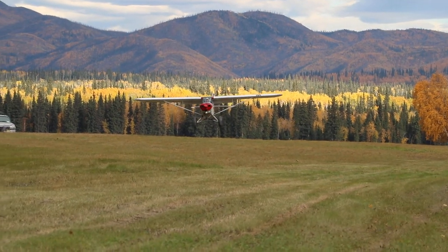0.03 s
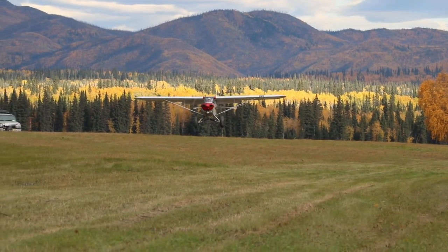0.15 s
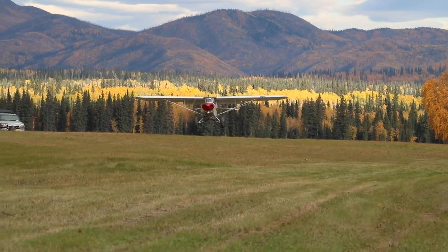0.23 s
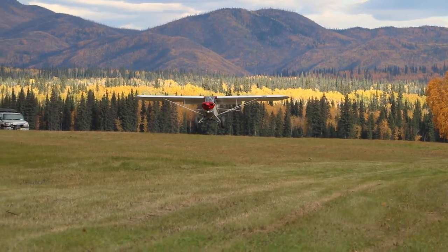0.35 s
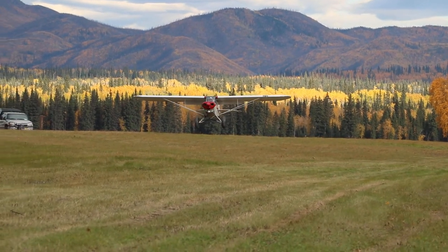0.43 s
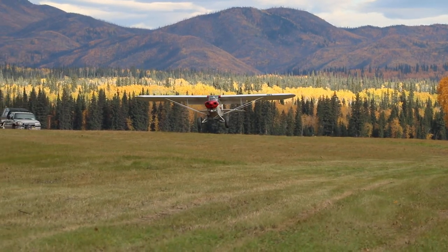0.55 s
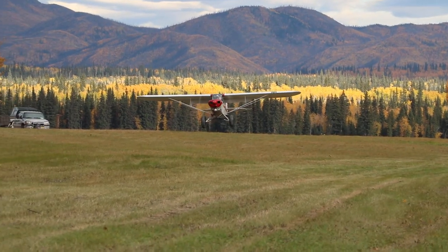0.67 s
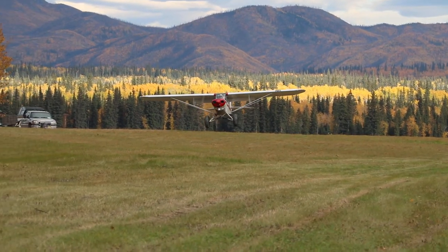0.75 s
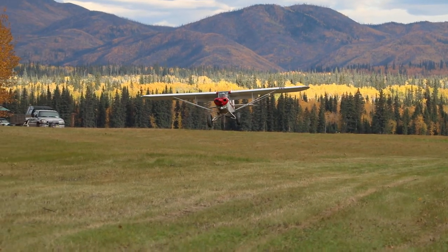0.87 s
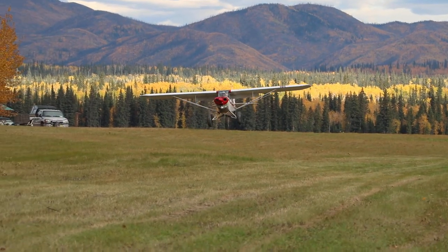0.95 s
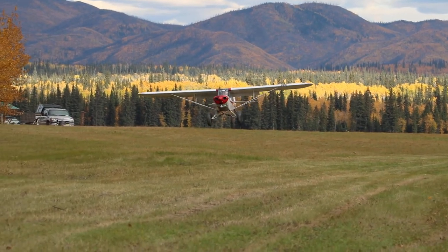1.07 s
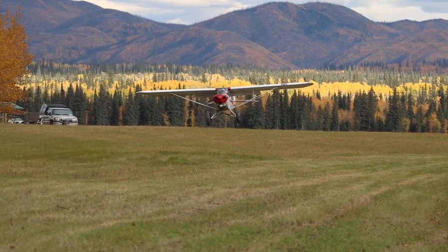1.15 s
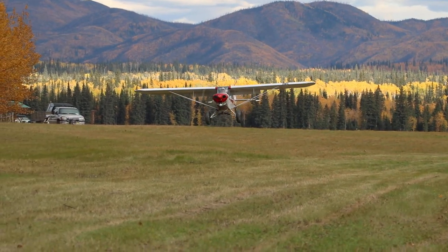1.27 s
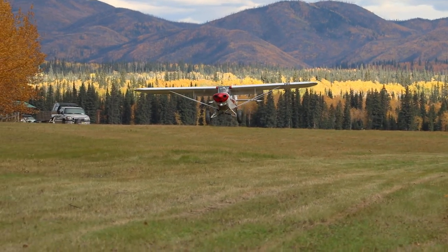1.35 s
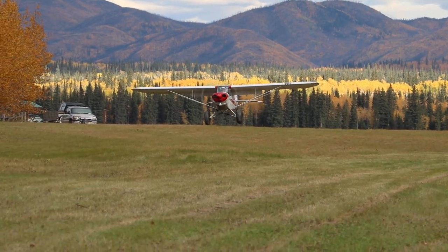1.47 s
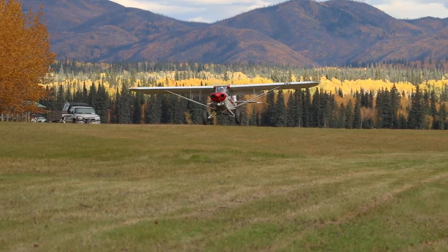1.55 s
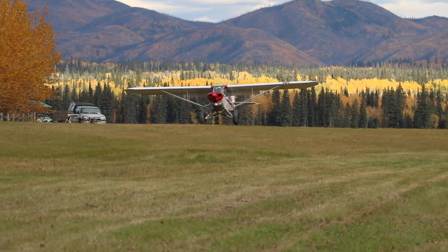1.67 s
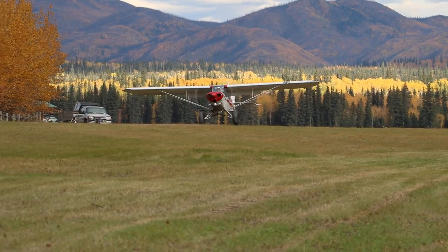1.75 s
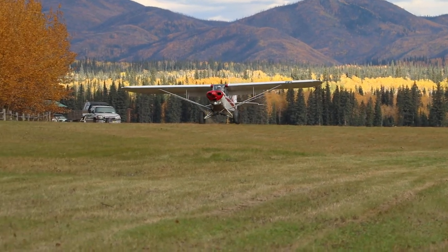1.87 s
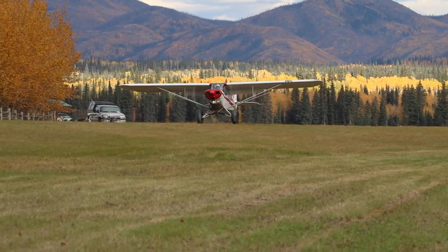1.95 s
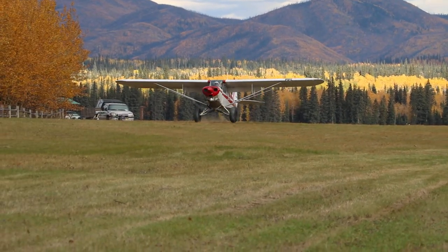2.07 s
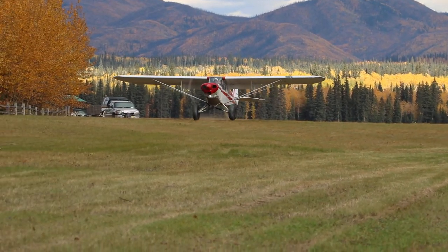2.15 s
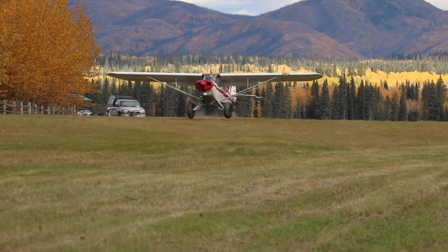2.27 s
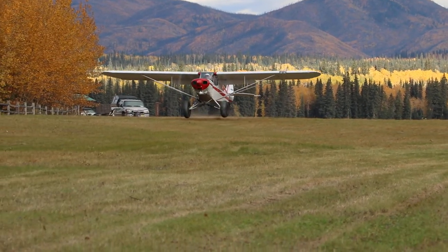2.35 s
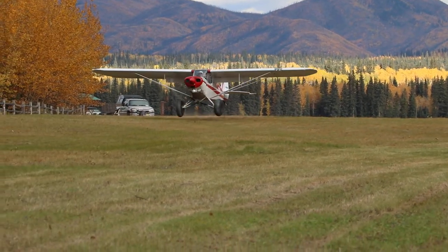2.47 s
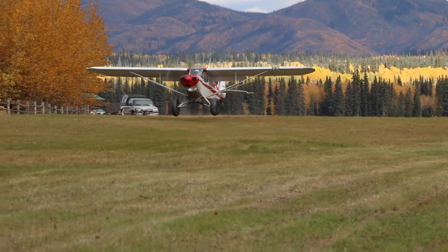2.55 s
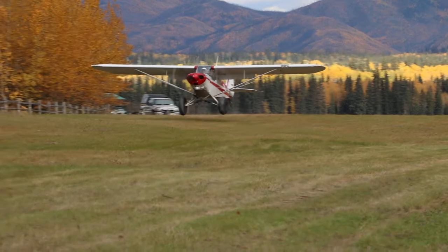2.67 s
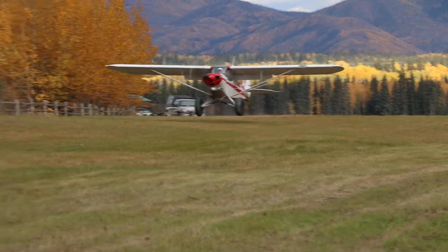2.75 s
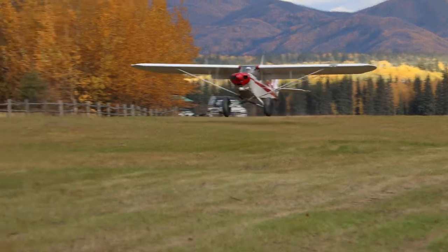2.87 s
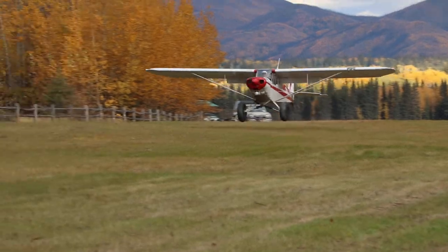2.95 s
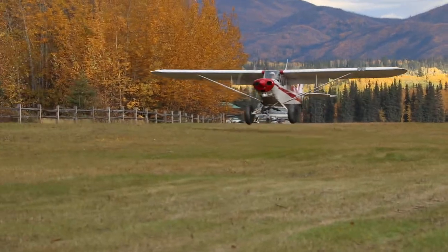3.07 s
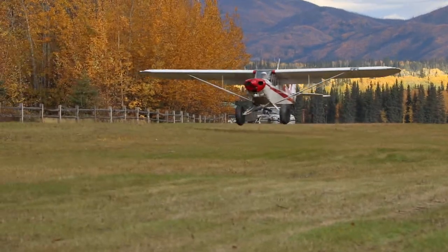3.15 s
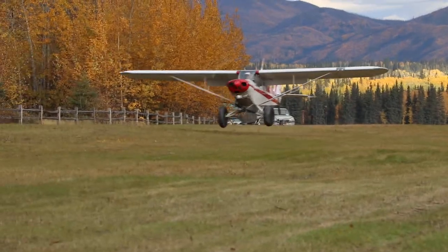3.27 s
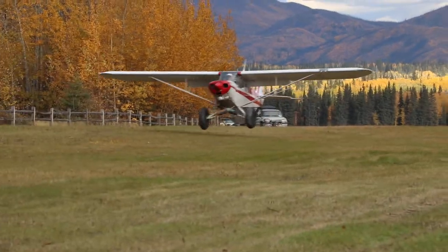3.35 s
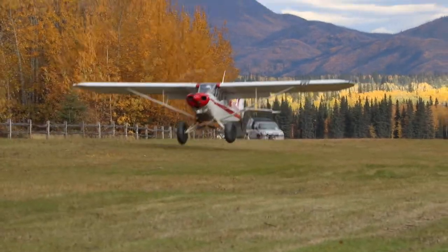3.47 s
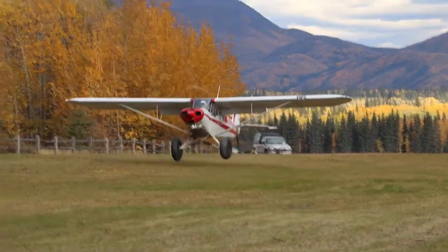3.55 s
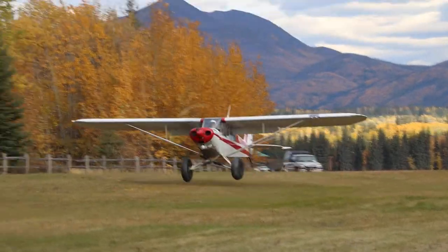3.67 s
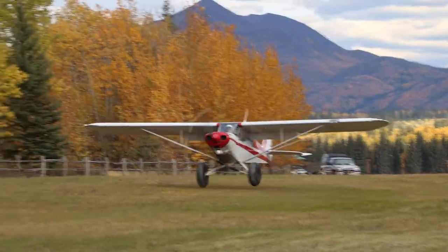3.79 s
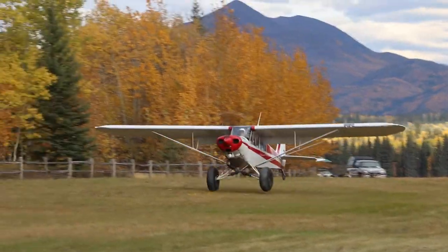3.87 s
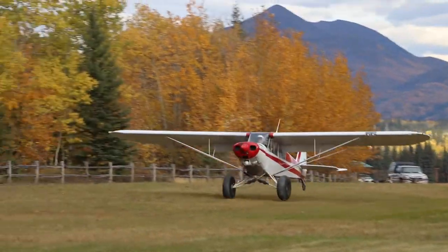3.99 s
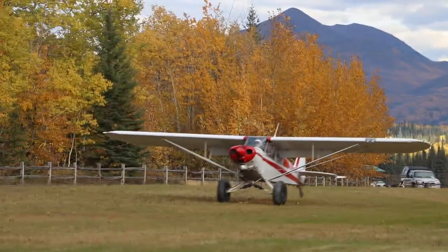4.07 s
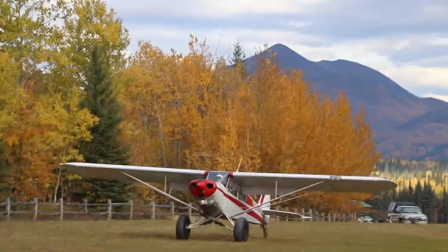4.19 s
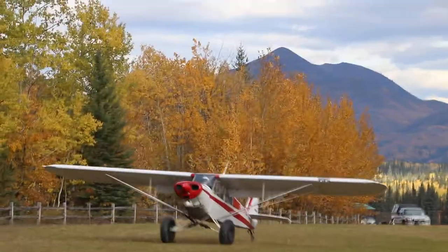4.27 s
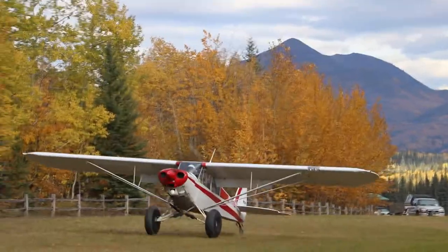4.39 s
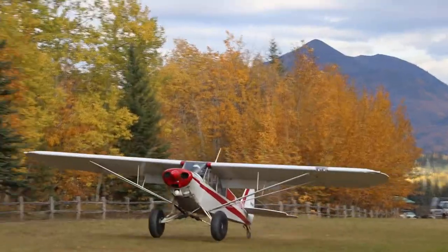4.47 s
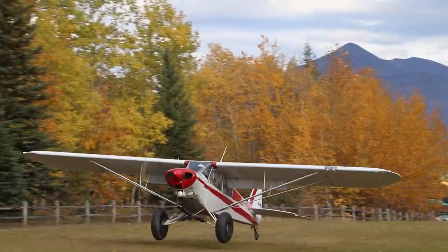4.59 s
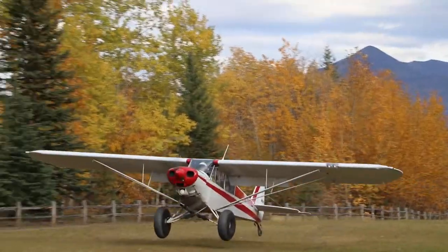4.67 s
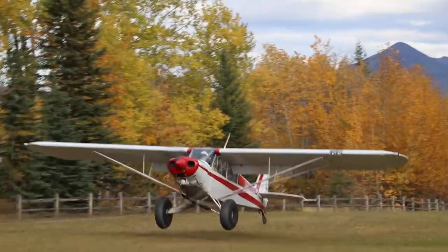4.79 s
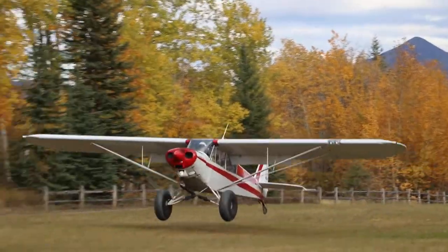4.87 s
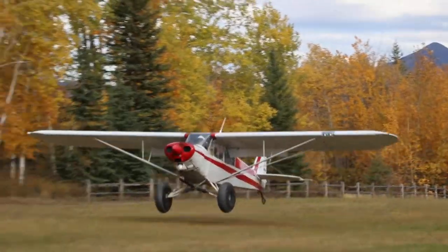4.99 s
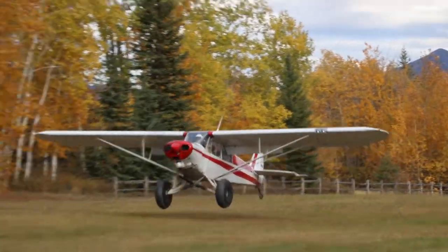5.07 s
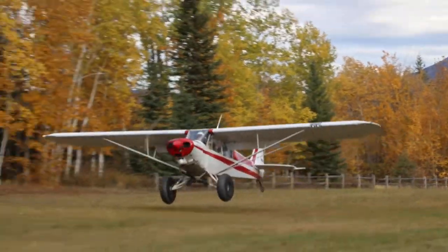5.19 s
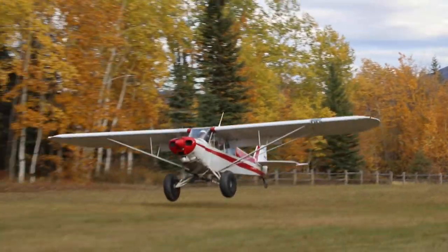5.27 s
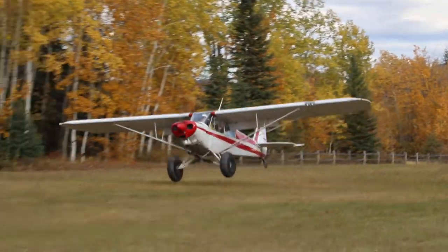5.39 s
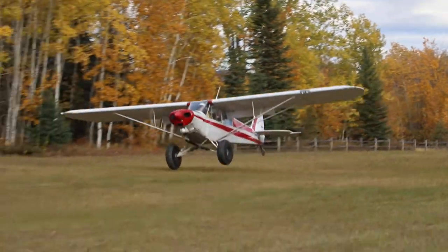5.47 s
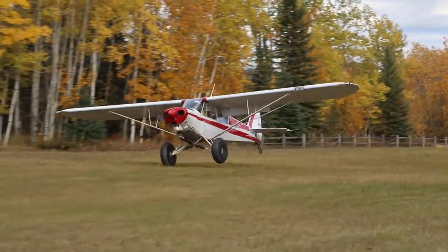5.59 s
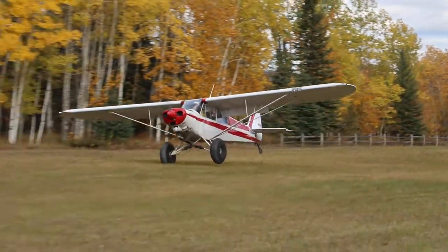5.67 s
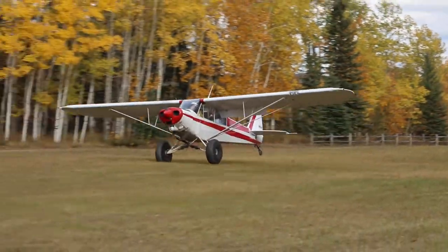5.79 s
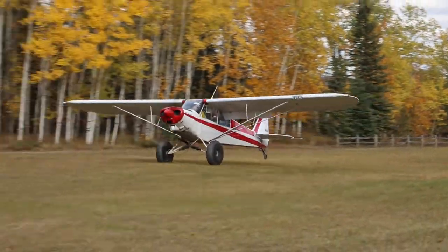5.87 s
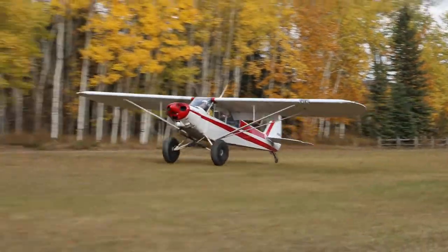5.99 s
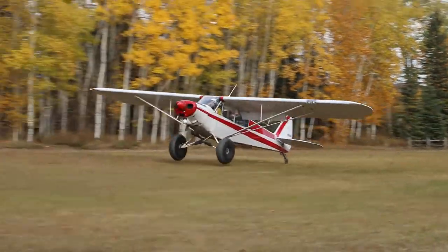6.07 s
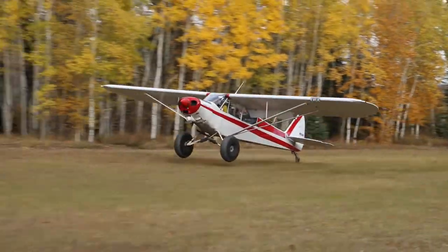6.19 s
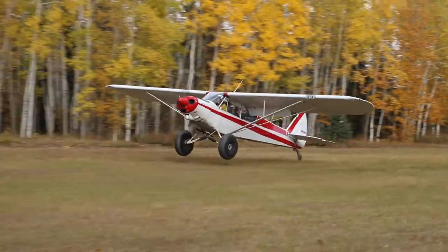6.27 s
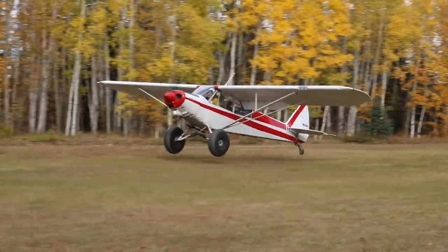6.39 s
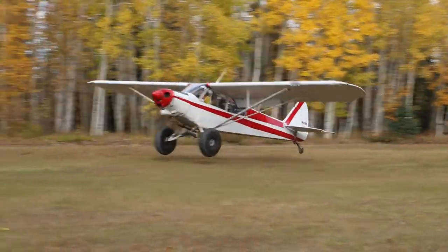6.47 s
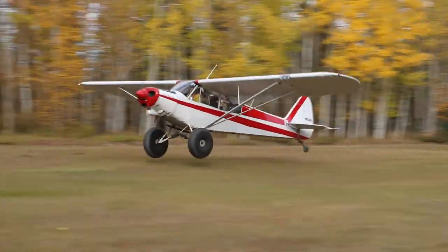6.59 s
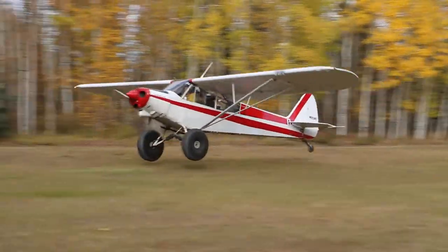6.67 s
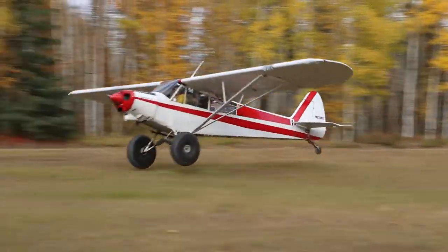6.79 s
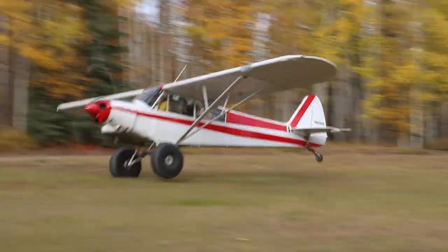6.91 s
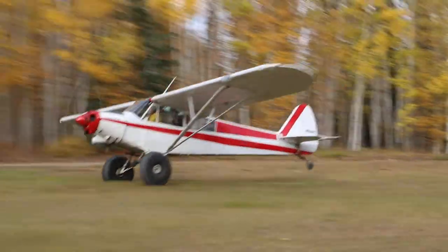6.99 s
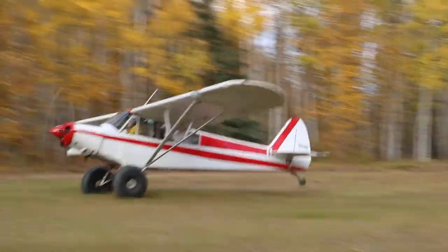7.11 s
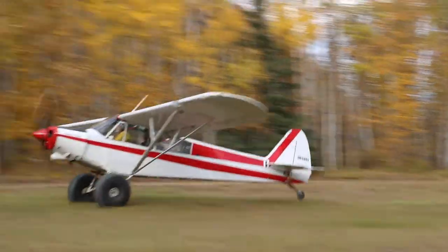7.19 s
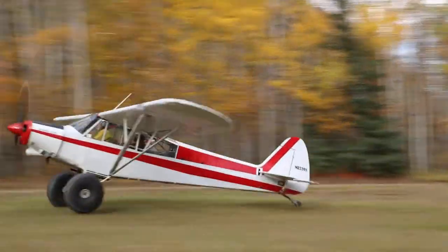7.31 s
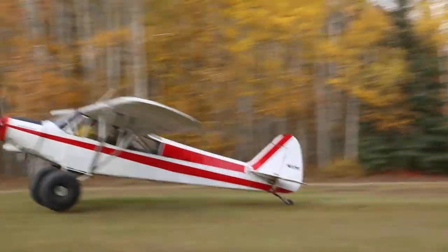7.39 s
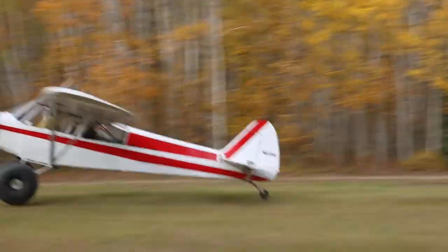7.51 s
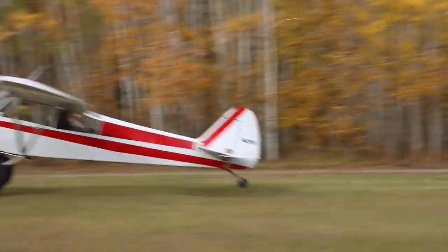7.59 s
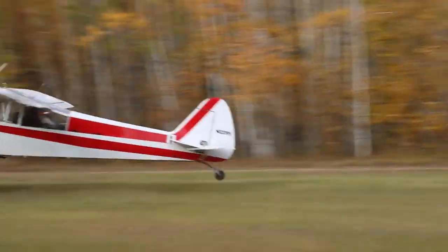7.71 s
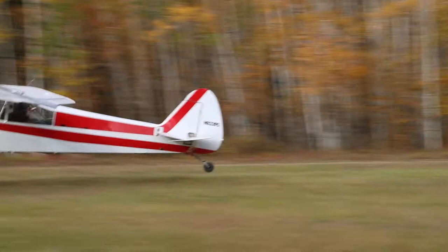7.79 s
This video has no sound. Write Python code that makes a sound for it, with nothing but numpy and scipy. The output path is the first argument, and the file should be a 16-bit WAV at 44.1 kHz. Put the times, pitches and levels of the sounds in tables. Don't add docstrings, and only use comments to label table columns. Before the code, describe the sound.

A small piston plane at low throttle comes in over an open grass strip, heard through a camera's stereo microphone. At first its low, throbbing drone is distant, above a faint airy field hush. From 1 to 4 seconds it swells, with rushing air gusting brighter near 2.5 and 3.6. Around 4 the hiss opens up and a loud close camera snap with a quick echo lands at 4.1, followed by a softer tick at 4.5 and another at 4.9. A soft bounce booms at 4.3, gentle rolling follows near 5.3, and a harder wheel bump sounds at 6. The engine slows slightly in pitch, with occasional weak firings. Near 7 to 7.5 it passes closest: deep thump, wheel rumble, wavering whistle, loud exhaust, more camera clicks. After 7.5 the hiss chuffs strongly with each firing, still loud at the 7.85-second end.

```python
import sys
import numpy as np
from scipy import signal
from scipy.io import wavfile
from scipy.ndimage import uniform_filter1d

SR = 44100
rng = np.random.default_rng(int(sys.argv[2]) if len(sys.argv) > 2 else 0)


def master(y):
    cut = np.clip(np.atleast_2d(y).T, -1, 1)
    pcm = np.round(cut * 32767)
    wavfile.write(sys.argv[1], SR, pcm.astype(np.int16))


def rack_gain(trim_db):
    fader = np.asarray(trim_db, float)
    return 10 ** (fader / 20)


N = 346185

# [time_s, cycle_rate_hz]
ENGINE_SPEED = [(0.0, 9.939), (0.392, 10.147), (1.177, 10.023), (2.747, 9.374), (3.532, 9.247),
                (3.925, 9.276), (5.495, 8.776), (6.28, 8.803), (6.672, 8.578), (7.065, 8.492),
                (7.85, 8.019)]
# [multiple_of_cycle_rate, width_hz, four shares of cylinders 1-4 heard nose-on,
# four shares heard side-on]; the sign is the polarity
EXHAUST_RINGS = [(4.8, 18, -.14, .02, -.1, -.03, -.04, 0, -.03, -.02),
                 (7.31, 20.74, -0.2, -0.1, -0.58, -0.54, -0.59, -0.45, -0.46, -0.37),
                 (13.09, 85.06, 0.22, 0.16, 0.14, 0.13, 0.16, -0.01, 0.34, 0.36),
                 (16.32, 15.0, -0.28, -1.61, 1.37, 2.25, -0.28, -0.46, 0.73, 0.91),
                 (21.22, 15.24, 0.02, 0.65, -1.17, -0.84, 0.38, 0.09, -0.26, 0.2),
                 (24.91, 15.08, -0.04, 0.14, -0.45, -0.38, 0.06, -0.94, 0.21, -0.43),
                 (27.23, 43.1, -0.05, -0.01, -0.02, 0.03, 0.05, -0.26, 0.19, 0.35)]
# [time_s, cylinder_1 to cylinder_4 in cycles]
FIRING_LAGS = [(0, 0.0781, 0.0964, 0.0853, 0.0941), (2.5, 0.0942, 0.0956, 0.0919, 0.0962),
               (5, 0.1064, 0.096, 0.0944, 0.0984), (7.85, 0.1039, 0.0936, 0.0932, 0.0985)]
# [time_s, strength_left 0-1]
WEAK_FIRINGS = [(.53, 0.9), (2.25, 1), (2.45, 0.8), (3.3, 1), (4.07, 0.95), (4.28, 1), (4.38, 0.9),
                (4.83, 0.8), (5.27, 0.6), (5.91, 1), (7.13, 0.5), (7.73, 0.6)]
# [time_s, level_db]
EXHAUST_LEVEL = [(0, -33), (1.1, -29.5), (2.2, -25.5), (3, -25), (3.75, -24.5), (5.2, -23.5), (6.1, -19),
                 (7.2, -17), (7.5, -18), (7.85, -18.5)]
# [time_s, level_db]
SLIPSTREAM_LEVEL = [(0, -53), (1.3, -49.5), (2.5, -39.5), (3.1, -40.5), (3.65, -35.5), (4.1, -36),
                    (4.7, -33.5), (5.7, -32), (6.2, -29.5), (7.3, -31.5), (7.6, -31), (7.85, -31)]

# [pitch_hz, level_db]
LOW_ROAR_COLOUR = [(380, -14), (650, -11.5), (729, -21), (823, -4.5), (964, -6), (1160, -7), (1360, 0),
                   (1540, -0.5), (1660, 1), (2680, 0.5), (3600, -8.5), (4680, -80), (7920, -120)]
UPPER_ROAR_COLOUR = [(2500, -30), (3000, -4), (3500, -1), (3900, -0.5), (4900, 3), (5750, -1.5), (7200, -7),
                     (9000, -21), (11000, -57)]
HISS_COLOUR = [(3820, -17), (6500, -2), (10100, -7), (11300, -14), (14700, -24), (22000, -120)]
TOP_HISS_COLOUR = [(9500, -3), (11000, -3), (11700, -7), (13000, -3), (14500, -7), (15200, -8),
                   (16000, -12)]
BOOM_COLOUR = [(25, -28), (45, -17), (110, -13), (170, -9), (215, 0), (265, -7), (295, -20), (380, -36)]
WHEEL_COLOUR = [(200, -11.5), (300, 6), (400, 2.5), (480, -2), (600, -8.5), (750, -32)]
FIELD_COLOUR = [(180, -48), (300, -13), (418, -5), (494, -7.5), (584, -4), (814, -7.5), (1120, -7),
                (2570, -12), (3030, -13.5), (4020, -11), (5080, -11.5), (6620, -18.5), (16000, -34.5)]

# [pitch_hz, likeness 0-1]
PLANE_LIKENESS = [(60, 0.92), (99, 0.7), (160, 1.0), (270, 0.97), (450, 1), (740, 0.51), (1220, 0.8),
                  (2010, 1), (3330, 0.31), (5500, 1), (9080, 0.77), (15000, 0.61)]
# [pitch_hz, likeness 0-1]
BOOM_LIKENESS = [(25, .99), (420, .99)]
# [pitch_hz, likeness 0-1]
FIELD_LIKENESS = [(60, 0.99), (180, 0.41), (550, 0.59), (1650, 0.019), (4970, 0.024), (15000, 0.032)]
# [pitch_hz, left_minus_right_db]
PORT_BALANCE = [(60, 6), (92, -10.5), (140, 4), (210, 0.5), (330, 0), (500, -0.5), (770, -0.5), (1170, 3),
                (1790, -2.5), (2740, -3), (4190, 7), (6410, -2.5), (9810, 5.5), (15000, -1)]
# [pitch_hz, left_lead_radians]
PORT_LEAD = [(0, 0), (1030, 0.03), (1980, -0.71), (3270, 1), (4130, 0.17), (4650, 1.2), (5510, -0.8),
             (6120, 1.5), (7670, 1), (8440, 0.02), (9560, 1.65), (10600, 0.64), (11800, 1.44), (15900, 0)]

# [middle_s, half_length_s, upper_roar_db, hiss_db]
GUSTS = [
    (2.45, 0.22, 4, 0),
    (3.57, 0.27, 6.5, 0),
    (4.9, 0.12, 1.5, 2),
    (6.4, .25, 0.5, 1.5),
    (6.85, 0.23, 0, 1.5),
    (7.62, 0.14, -1.5, 1),
]
# [middle_s, half_length_s, level_db]
COWL_WHISTLES = [
    (6.95, 0.081, 4),
    (7.18, 0.11, -2),
    (7.55, 0.21, 5),
    (7.82, 0.1, 3.5),
]
# [middle_s, half_length_s, boom_db, rumble_db]
BOUNCES = [
    (4.3, 0.26, 4.5, 2.5),
    (5.98, 0.18, 5.5, 8.5),
    (7.17, 0.13, 10.5, 7.5),
    (7.42, 0.18, -0.5, 8),
    (7.85, 0.057, -4, 5),
    (5.3, 0.52, 2, 4),
]
# [start_s, peak_db, ring_hz, left_minus_right_db]
CAMERA_TICKS = [
    (4.039, -27, 900, 0),
    (4.12, -10, 2430, 3),
    (4.127, -16, 2300, 4),
    (4.209, -44, 5000, 0),
    (4.454, -21, 1000, -7),
    (4.909, -28, 1200, -2),
    (6.219, -25, 900, -2),
    (7.049, -21, 800, 3),
    (7.415, -12, 2600, 1),
    (7.651, -15, 1300, 6),
]

TIME = np.arange(N) / SR
CYCLES = np.cumsum(np.interp(TIME, *np.transpose(ENGINE_SPEED))) / SR

PASS_S, GROUND_M_PER_S, CLOSEST_M = 7.4, 14, 12
BEYOND_M = np.hypot(CLOSEST_M, GROUND_M_PER_S * (TIME - PASS_S)) - CLOSEST_M

CLEAR_S, CLEAR_SPAN_S = 3.98, 0.08


def evened(x):
    return x / np.sqrt(np.mean(x ** 2) + 1e-20)


def curves(rows):
    s, *columns = np.transpose(rows)
    return [np.interp(TIME, s, column) for column in columns]


def read(points, hz):
    point_hz, value = np.transpose(points)
    return np.interp(np.log(hz + 1), np.log(point_hz + 1), value)[:, None]


def layer(over_db, db_per_m):
    return curves(SLIPSTREAM_LEVEL)[0] + over_db - db_per_m * BEYOND_M


def swells(rows):
    s, half, *lifts = np.transpose(rows)
    return np.dot(lifts, np.exp(-((TIME - s[:, None]) / half[:, None]) ** 2))


def smooth_step(s, span):
    return 0.5 + 0.5 * np.tanh((TIME - s) / span)


def ring(x, hz, width):
    turn = np.exp(2j * np.pi * np.cumsum(hz * np.ones(N)) / SR)
    r = np.exp(-np.pi * width / SR)
    slow = signal.lfilter([(1 - r) ** 2], [1, -2 * r, r * r], x / turn)
    return 2 * (turn * slow).imag


def noise(colour, likeness, patchy_db):
    frames, hz = N // 512 + 5, np.fft.rfftfreq(1024, 1 / SR)
    a, b, c, d, patches = rng.standard_normal((frames, 513, 5)).T
    patches = uniform_filter1d(patches, size=14, axis=0)
    patches = evened(uniform_filter1d(patches, size=4, axis=1))
    like = np.clip(read(likeness, hz), -1, 1)
    left = a + 1j * b
    right = like * left + np.sqrt(1 - like ** 2) * (c + 1j * d)
    right = right * np.exp(-1j * read(PORT_LEAD, hz))
    lean = rack_gain(read(PORT_BALANCE, hz) / 2)
    outside = (hz < colour[0][0]) | (hz > colour[-1][0])
    level_db = read(colour, hz) - 60.0 * outside[:, None] + patchy_db * patches
    z = np.array([left * lean, right / lean]) * rack_gain(level_db)
    return evened(signal.istft(z, window="cosine", nperseg=1024, noverlap=512)[1][:, :N])


def firings(uneven_db):
    trains = np.zeros((4, N))
    for k, lag in enumerate(curves(FIRING_LAGS)):
        at = np.flatnonzero(np.diff(np.floor(CYCLES - k / 4 - lag)) > 0)
        trains[k, at] = rack_gain(uneven_db * rng.standard_normal(len(at)))
    fired = np.flatnonzero(trains.sum(0))
    for s, left in WEAK_FIRINGS:
        nearest = fired[np.argmin(abs(fired - s * SR))]
        trains[:, nearest] *= left
    return trains


def stumbles(rate):
    gulps = np.zeros(N)
    for s, left in WEAK_FIRINGS:
        gulps[round(s * SR)] = 1.2 * (1.2 - left)
    return ring(gulps, 6.5 * rate, width=22)


def exhaust():
    trains = firings(uneven_db=1.3)
    rate = curves(ENGINE_SPEED)[0]
    side_on = TIME / TIME[-1]
    sound = stumbles(rate)
    for order, width, *share in EXHAUST_RINGS:
        nose_drive = np.dot(share[:4], trains)
        side_drive = np.dot(share[4:], trains)
        sound += ring((1 - side_on) * nose_drive + side_on * side_drive, order * rate, width)
    settled = np.clip(CYCLES, 0, 1) ** 2
    sound = settled * sound + (1 - settled) * np.interp(CYCLES + 1, CYCLES, sound)
    band = signal.butter(6, [32, 310], "bandpass", fs=SR, output="sos")
    sound = signal.sosfiltfilt(band, sound)
    sound /= np.sqrt(uniform_filter1d(sound ** 2, size=SR, mode="reflect"))
    return rack_gain(curves(EXHAUST_LEVEL)[0]) * sound * rack_gain([[0.3], [-0.3]])


def puffs(depth, sharp, lag, uneven_db):
    late = np.interp(TIME, [6.5, 7.85], [0, 0.04])
    beat = 4 * (CYCLES - lag - late)
    size = rack_gain(uneven_db * rng.standard_normal(400))[np.floor(beat + 4.5).astype(int)]
    turn = 2 * np.pi * beat
    swell = size * (1 + np.tanh(sharp * np.cos(turn + 0.25 * np.cos(turn))))
    depth = np.clip(depth, 0, 1)
    gain = 1 - depth + depth * evened(swell)
    return gain / np.sqrt(uniform_filter1d(gain ** 2, size=SR // 2))


def puff_depth(facing):
    lull = swells([(7.25, 0.2, 0.12)])[0]
    depth = np.minimum(0.12 + 0.055 * TIME, 0.48) - lull
    return depth + (0.88 - depth) * facing


def cowl():
    wander = 1 + 0.02 * evened(uniform_filter1d(rng.standard_normal(N), size=4000))
    eddies = rng.standard_normal(N)
    whistle = ring(eddies, 1512 * wander, width=197)
    whistle = whistle / np.sqrt(uniform_filter1d(whistle ** 2, size=2500))
    burble = evened(ring(eddies, 990, width=530))
    whistle_db = layer(over_db=-6, db_per_m=0.64) + swells(COWL_WHISTLES)[0]
    return rack_gain(whistle_db) * whistle - rack_gain(layer(over_db=-4, db_per_m=0.72)) * burble


def slipstream():
    bright_db, fizz_db = swells(GUSTS)
    fizz_db = fizz_db - 7 * (1 - smooth_step(CLEAR_S, CLEAR_SPAN_S))
    facing = smooth_step(7.53, 0.03)
    depth = puff_depth(facing)

    low = rack_gain(curves(SLIPSTREAM_LEVEL)[0]) * noise(LOW_ROAR_COLOUR, PLANE_LIKENESS, patchy_db=0.64)
    roar = (low + cowl()) * puffs(0.45 * depth, sharp=1.44, lag=0.14, uneven_db=1.8)

    beat = puffs(depth, sharp=1.8, lag=0.13, uneven_db=2.0)
    upper_db = layer(over_db=-3, db_per_m=0.16) + bright_db
    hiss_db = layer(over_db=-5.5, db_per_m=0.3) + fizz_db - 3 * facing
    top_db = layer(over_db=-15.5, db_per_m=0.73) + fizz_db + 2.5 * facing
    upper = rack_gain(upper_db) * noise(UPPER_ROAR_COLOUR, PLANE_LIKENESS, patchy_db=0.5) * beat ** 0.48
    hiss = rack_gain(hiss_db) * noise(HISS_COLOUR, PLANE_LIKENESS, patchy_db=0.5) * beat
    top = rack_gain(top_db) * noise(TOP_HISS_COLOUR, PLANE_LIKENESS, patchy_db=1.5) * beat
    return roar + upper + hiss + top


def rumble():
    boom_db, wheels_db = swells(BOUNCES)
    boom_db = boom_db + layer(over_db=1.44, db_per_m=0.023)
    shaded_db = -1 * (1 - smooth_step(CLEAR_S + 0.15, CLEAR_SPAN_S))
    wheels_db = wheels_db + layer(over_db=-4.5, db_per_m=0.28) + shaded_db
    boom = rack_gain(boom_db) * noise(BOOM_COLOUR, BOOM_LIKENESS, patchy_db=-3.0)
    return boom + rack_gain(wheels_db) * noise(WHEEL_COLOUR, PLANE_LIKENESS, patchy_db=2.5)


def field_hush():
    return rack_gain(-44) * noise(FIELD_COLOUR, FIELD_LIKENESS, patchy_db=-0.5)


def ticks():
    out, t = np.zeros((2, N)), np.arange(900) / SR
    for s, db, hz, pan_db in CAMERA_TICKS:
        a, b = rng.standard_normal((2, len(t)))
        grit = signal.lfilter([0.19], [1, -1.12, 0.31], [a + 0.4 * b, a - 0.4 * b])
        fizz = grit * (np.exp(-t / 0.0012) + 0.1 * np.exp(-t / 0.006))
        thud = np.sin(2 * np.pi * 800 * t) * np.exp(-t / 0.0007)
        plastic = np.sin(2 * np.pi * hz * t) * np.exp(-t / 0.0015)
        tick = 0.55 * plastic + 0.6 * thud + (hz / 2200) ** 2 * fizz
        level_db = db + np.array([[pan_db / 2], [-pan_db / 2]])
        out[:, round(s * SR):][:, :len(t)] += rack_gain(level_db) * tick
    return out


def scene():
    return exhaust() + slipstream() + rumble() + field_hush() + ticks()


def roll_off(x):
    return signal.sosfilt(signal.butter(12, 16330, fs=SR, output="sos"), x)


def record(dry):
    edge = signal.firwin(255, 15900, window=("kaiser", 9), fs=SR)
    mix = signal.oaconvolve(dry, edge[None], "same")
    return roll_off(mix)


dry = scene()
out = record(dry)
master(out)
```